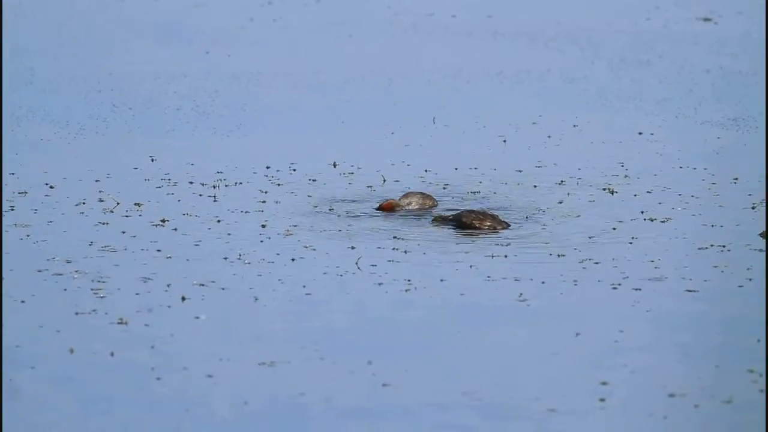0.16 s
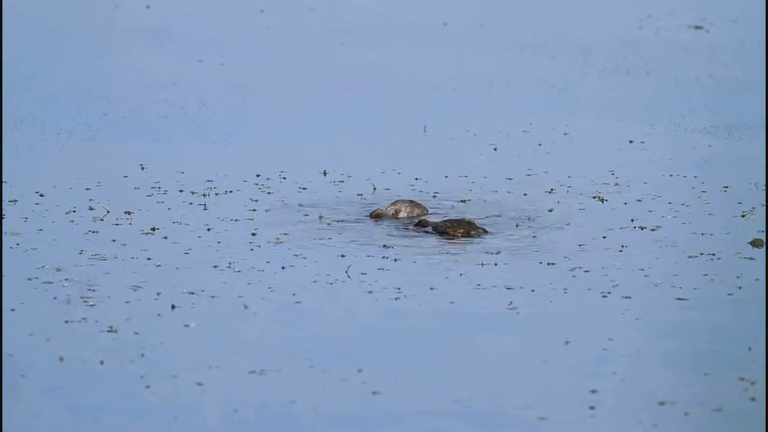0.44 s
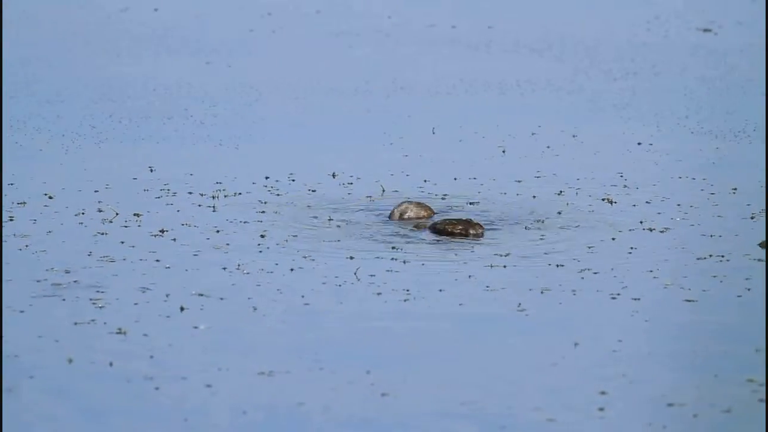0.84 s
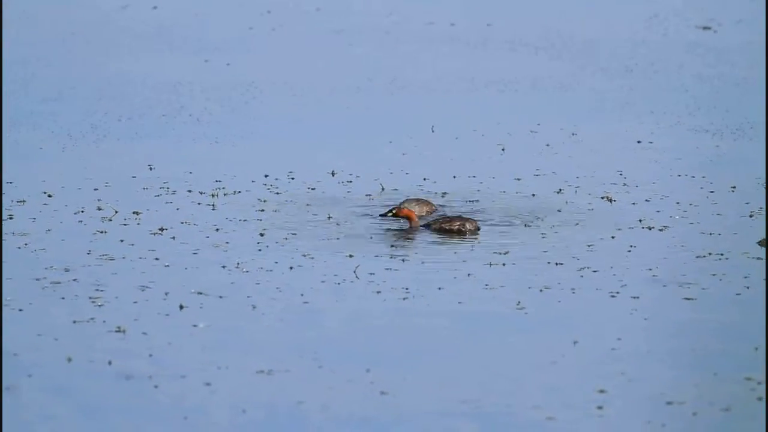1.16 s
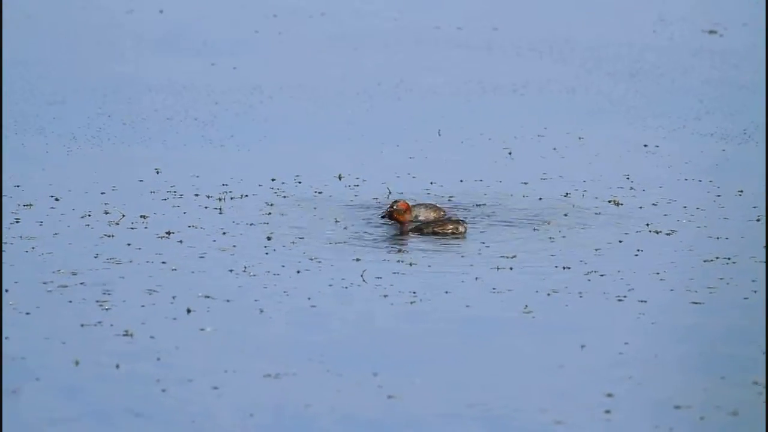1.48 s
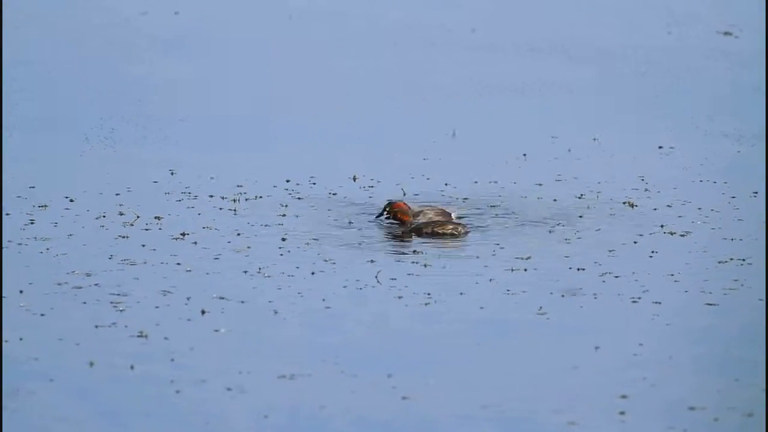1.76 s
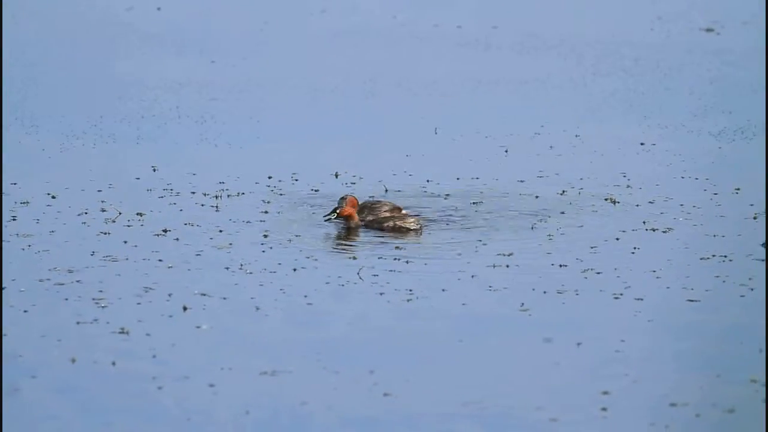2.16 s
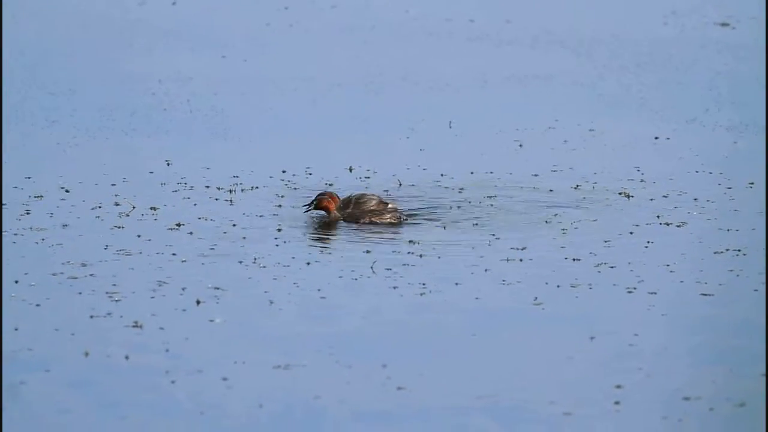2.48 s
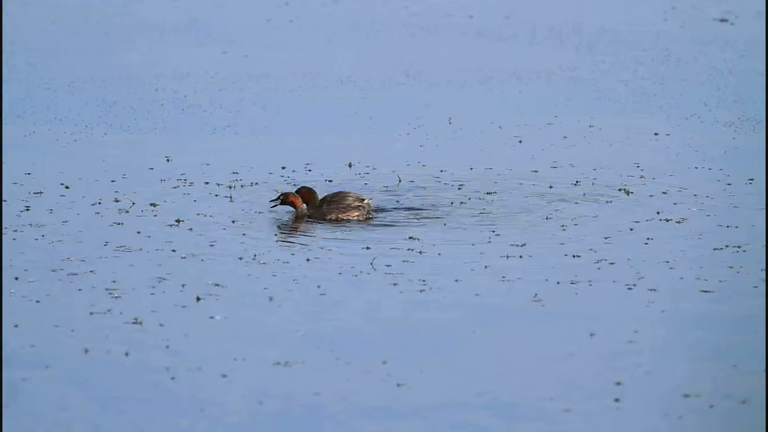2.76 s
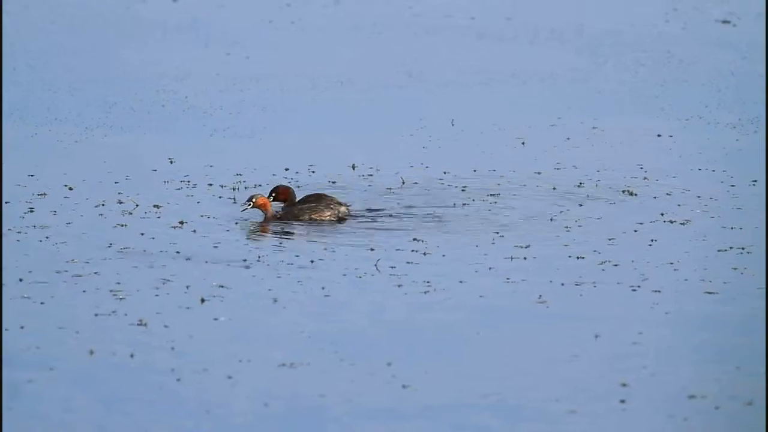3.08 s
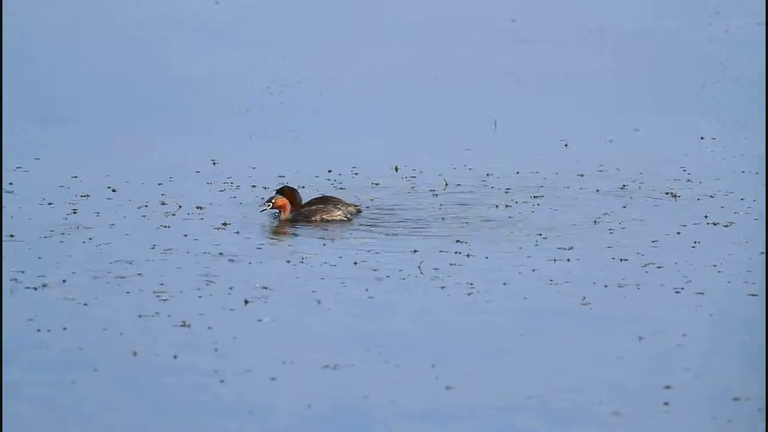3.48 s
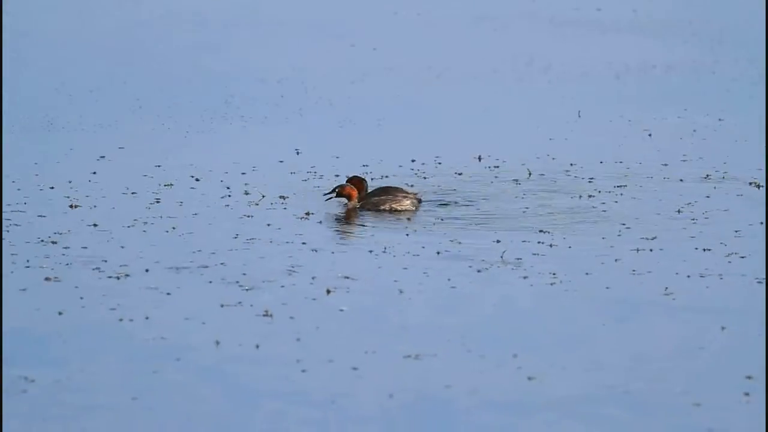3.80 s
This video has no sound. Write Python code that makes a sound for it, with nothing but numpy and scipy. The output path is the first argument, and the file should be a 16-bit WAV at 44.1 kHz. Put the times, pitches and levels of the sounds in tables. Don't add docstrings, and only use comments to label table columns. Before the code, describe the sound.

After about two seconds of hissy outdoor quiet with far birdsong and wind bumps on the microphone, two water birds burst into a fast chattering duet, one voice low and clean, the other higher and hoarse.

```python
import sys
import numpy as np
from scipy import signal
from scipy.fft import rfft, irfft, next_fast_len
from scipy.io import wavfile
from scipy.ndimage import uniform_filter1d, map_coordinates

SR = 44100
rng = np.random.default_rng(int(sys.argv[2]) if len(sys.argv) > 2 else 0)


def volts_from_decibels(level):
    exponent = np.asarray(level, float) / 20
    return 10 ** exponent


def waveform_to_disk(signal):
    frames = np.transpose(np.atleast_2d(signal))
    scaled = np.clip(frames, -1, 1) * 32767
    samples = np.round(scaled).astype(np.int16)
    wavfile.write(sys.argv[1], SR, samples)


N = 173754

# (f/Hz, density/dB per Hz)
AIR_SPECTRUM = [(240, -4.5), (400, -3.5), (552, -8.5), (835, -8), (2800, -19.5), (3270, -18), (3920, -21),
                (4650, -23.5), (15600, -34)]
# (f/Hz, level/dB)
LOW_THROAT = [(1150, -7), (1400, -12), (5150, -6), (5450, -19), (6900, -24), (9500, -34.5), (12500, -26),
              (14000, -24), (15500, -39)]
HOARSE_THROAT = [(1500, -11.5), (5500, -34.5), (6400, -23.5), (8000, -34.5), (10500, -28.5), (13000, -19),
                 (14500, -30), (15500, -42)]
# (t/s, level/dB)
EFFORT = [(1.9, 3), (2.1, -1), (2.27, 5), (2.45, 4.5), (2.6, 0), (3.2, .2), (3.9, -2.5)]
CLEAR_HZ = 1534


def unit(x):
    return x / np.sqrt(np.mean(x ** 2) + 1e-20)


def along(points, hz):
    f, v = np.transpose(points)
    return np.interp(np.log(hz + 1), np.log(f + 1), v)


def wobble(rate, size=N):
    knots = rng.standard_normal(size // 16 + 9)
    return map_coordinates(knots, [np.arange(size) * rate / SR])


def noise(response):
    m = next_fast_len(N)
    spectrum = rfft(rng.standard_normal(m)) * response(np.fft.rfftfreq(m, 1 / SR))
    return unit(irfft(spectrum, m)[:N])


def echoes(x, t60):
    t = np.arange(SR // 2) / SR
    tail = rng.standard_normal(len(t)) * volts_from_decibels(-60 * t / t60) * (t > .004)
    return signal.fftconvolve(x, tail / np.linalg.norm(tail))[:N]


def air():
    return volts_from_decibels(-46) * noise(lambda hz: volts_from_decibels(along(AIR_SPECTRUM, hz)))


def rumble():
    # (f/Hz, density/dB per Hz)
    rumble_spectrum = [(22, -23), (50, 1.5), (150, -1.5), (350, -2.5), (480, -44), (900, -120)]
    level_db = -44.5 + 2.17 * wobble(25.165) + 0.37 * wobble(3.27)
    return volts_from_decibels(level_db) * noise(lambda hz: volts_from_decibels(along(rumble_spectrum, hz)))


def insects():
    centre_hz, width_hz = 3250, 120
    level_db = -59.8 - 1.2 * np.arange(N) / SR + 1.5 * wobble(8)
    return volts_from_decibels(level_db) * noise(lambda hz: np.exp(-((hz - centre_hz) / width_hz) ** 2))


def far_chorus():
    # (f/Hz, width/Hz, level/dB, fading/dB per s)
    blurs = [
        (2300, 350, -60, 1.5),
        (4700, 500, -64, 1.5),
    ]
    t, out = np.arange(N) / SR, np.zeros(N)
    for centre_hz, width_hz, db, fade_db in blurs:
        band = noise(lambda f: np.exp(-((f - centre_hz) / width_hz) ** 2))
        out += volts_from_decibels(db - fade_db * t + 1.5 * wobble(6)) * band
    return out


def rustle():
    # (t/s, half length/s, level/dB)
    rustles = [
        (1.455, .015, -53),
        (1.957, .003, -48),
    ]
    t = np.arange(N) / SR
    envelope = sum(volts_from_decibels(db) * np.exp(-((t - s) / half_s) ** 2) for s, half_s, db in rustles)
    return envelope * noise(lambda hz: volts_from_decibels(along(AIR_SPECTRUM, hz)) * (hz > 1900))


def drone():
    # (f/Hz, level/dB, fading/dB per s)
    engine_orders = [(97.7, -42.5, 1.67), (197, -48.5, 3.5), (226.8, -50.5, 8.5), (259.9, -52, 3),
                     (300.5, -48.5, 7)]
    t, out = np.arange(N) / SR, np.zeros(N)
    for hz, db, fade_db in engine_orders:
        level_db = db - fade_db * t + 1.6 * wobble(9.47)
        out += np.sqrt(2) * volts_from_decibels(level_db) * np.sin(2 * np.pi * hz * t)
    return out


def bumps():
    # (t/s, peak level/dB, f/Hz)
    pushes = [(1.843, -26.5, 131), (1.882, -19.5, 96.4), (2.791, -24.5, 280), (2.799, -26.5, 95),
              (2.982, -29.5, 94), (3.172, -27.5, 127), (3.47, -29.5, 100)]
    t, out = np.arange(N) / SR, np.zeros(N)
    for s, db, hz in pushes:
        envelope = np.exp(-((t - s) * hz / 0.58) ** 2)
        out += volts_from_decibels(db) * envelope * np.cos(2 * np.pi * hz * (t - s))
    return out


def songbirds():
    # (t after start/s, f/Hz, level/dB)
    falling = [(0, 4400, -7), (.022, 5000, -5), (0.048, 4860, 1), (.066, 4400, -6.5), (0.101, 3950, -1),
               (0.136, 3665, -7.5), (0.176, 3900, -1), (.222, 3450, -7)]
    rising = [(0, 4350, -2), (.08, 5300, 3.5), (.12, 6500, -2), (.145, 7200, -8)]
    chip = [(0, 3600, 0), (.018, 3300, 0)]
    # (start/s, level/dB, phrase, share of side partials)
    songs = [(.01, -49, falling, 1), (.53, -61, rising, 0), (1.012, -49, falling, 0.9),
             (1.725, -55, chip, 0), (3.78, -67, rising, 0)]
    t, out = np.arange(N) / SR, np.zeros(N)
    for start, song_db, phrase, rich in songs:
        s, hz, db = np.transpose(phrase)
        glide = uniform_filter1d(np.interp(t - start, s, hz), size=400)
        half_turn = np.pi * np.cumsum(glide * (1 + .015 * wobble(150))) / SR
        side_partials = volts_from_decibels(-7.5) * np.sin(half_turn) + volts_from_decibels(-16) * np.sin(3 * half_turn)
        tone = np.sin(2 * half_turn) + rich * side_partials
        contour_db = song_db + np.interp(t - start, s, db, -120, -120)
        envelope = uniform_filter1d(volts_from_decibels(contour_db), size=300) * volts_from_decibels(3.5 * wobble(130))
        out += envelope * tone * np.sqrt(2)
    return out + volts_from_decibels(-3) * echoes(out, .3)


def rasp():
    t = np.arange(N) / SR
    level_db = -57.5 + 2 * np.interp(t, *np.transpose(EFFORT))
    hiss = noise(lambda hz: volts_from_decibels(along(LOW_THROAT, hz) / 2) * (hz > CLEAR_HZ))
    return volts_from_decibels(level_db) * (t > 2.04) * hiss


def sing(rows, shape, throat, order, hoarser=0, pointed=0, beat=0, tail=1, sag_db=0):
    flutter_hz, jitter = 449, 0.06
    strong_db = -30
    half_s, edge, rise, fall, power, rough, scatter_db = shape
    out, t = np.zeros(N + SR), np.arange(-1024, 1024) / SR
    size, k = len(t), np.arange(1, 15)[:, None]
    for s, top_hz, db, lower_db, *length in rows:
        weak_db = strong_db - db
        highest = k * top_hz > 6000
        u = np.clip(t / half_s / np.prod(length) / np.where(t > 0, tail, 1), -1, 1)
        cap = np.sin(np.pi / 2 * np.clip((edge - abs(u)) / 0.4, 0, 1))
        slide = volts_from_decibels(min(-8 + weak_db / 2, -2)) * np.clip(6 * (1 - abs(u)), 0, 1)
        swell = np.maximum(cap, slide)

        unsteady = rough * (1 + hoarser * max(1 - top_hz / CLEAR_HZ, 0)) + .5 * (1 - cap) ** 2
        arch = abs(u) ** max(power - pointed * max(weak_db, 0), 1.5)
        hz = top_hz * (1 - np.where(u < 0, rise, fall) * arch)
        hz = hz * (1 + jitter * np.tanh(unsteady) * wobble(flutter_hz, size))

        level = db + lower_db / 2 + along(throat, k * hz) + scatter_db * rng.standard_normal(k.shape)
        level += np.interp(s, *np.transpose(EFFORT)) * highest
        level[order - 1] = db + min(lower_db, 0) * (1 - cap)
        level[order - 2] = db + lower_db
        level[order] += min(lower_db, 0) / 2
        level -= sag_db * u + 18 * (k > 1) * np.clip((2050 - k * hz) / 250, 0, 1)

        shake = 1 + unsteady * np.array([wobble(flutter_hz, size) for _ in k])
        breath = volts_from_decibels(-12) + 3 * unsteady ** 2 / (1 + unsteady) * highest
        shake += breath * np.array([wobble(top_hz, size) for _ in k])

        turn = 2 * np.pi * (k * np.cumsum(hz) / SR + rng.random(k.shape))
        beat_turn = 2 * np.pi * np.cumsum(430 * (1 + .15 * wobble(120, size))) / SR
        depth = np.tanh(beat * unsteady) * (k >= order)
        tone = (np.sin(turn) + depth * np.sin(turn - beat_turn)) / np.sqrt(1 + depth ** 2)
        partials = volts_from_decibels(level) * shake * (k * hz < 15780) * tone
        note = swell * partials.sum(0) / np.sqrt(1 + unsteady ** 2)
        out[round(s * SR) - size // 2:][:size] += note
    return out[:N]


def first_tries():
    # (centre/s, top f/Hz, third partial/dB, second over third/dB, length over the usual)
    tries = [
        (1.834, 1070, -53, -9),
        (1.942, 1150, -49, -9),
        (2.016, 1430, -45, 4, 1.7),
        (2.077, 1100, -54, 17, .55),
    ]
    # (half length/s, cap share, pitch drop at start, at end, arch power, roughness, scatter/dB)
    try_shape = (.012, .95, .3, .02, 1.1, .2, 3)
    return sing(tries, try_shape, HOARSE_THROAT, order=3, tail=.35)


def whistled_notes():
    # (centre/s, f/Hz, second partial/dB, first over second/dB, length over the usual)
    whistles = [(1.817, 2110, -58, 14, .75), (1.870, 2010, -51, 9.5, 1.4), (1.898, 2237, -45, 9, .55),
                (1.911, 2504, -49, 9.5, .5), (1.932, 2100, -58, 17, .65), (2.022, 2360, -42, 5, .7),
                (2.085, 2476, -32.5, -4.5), (2.147, 2479, -30.5, -4), (2.208, 2464, -31, -1),
                (2.686, 2460, -32, -5), (2.741, 2452, -32.5, -2), (2.793, 2490, -32.5, -1.5),
                (2.859, 2472, -33.5, -1), (3.209, 2350, -38, 3, .45), (3.263, 2350, -32.5, 1.5),
                (3.319, 2332, -31, 0.5), (3.383, 2314, -31.5, 1.5)]
    # (f/Hz, level/dB)
    whistle_throat = [(6000, -28.5), (7400, -15), (9800, -23), (12200, -20.5), (14700, -21)]
    # (half length/s, cap share, pitch drop at start, at end, arch power, roughness, scatter/dB)
    opening_shape = (0.0151, 0.95, 0.07, .03, 1.5, 0.1, 3)
    whistle_shape = (.0105, .9, .02, .03, 3, .06, 3.5)
    croak_shape = (.009, .9, .22, .05, 1.5, 1.4, 3)
    croaks = [(s - .012, hz * .58, db, -4) for s, hz, db, *_ in whistles[7:]]
    openings = sing(whistles[:5], opening_shape, whistle_throat, order=2)
    trill = sing(whistles[5:], whistle_shape, whistle_throat, order=2)
    return openings + trill + sing(croaks, croak_shape, HOARSE_THROAT, order=3)


def hoarse_notes():
    # (centre/s, top f/Hz, third partial/dB, second over third/dB, length over the usual)
    hoarse = [(2.264, 1435, -26, -6.5), (2.327, 1556, -27, -4), (2.385, 1612, -28.5, -4),
              (2.444, 1633, -29, -2.5), (2.502, 1570, -30.5, -5.5), (2.561, 1481, -24.5, -9.5),
              (2.621, 1550, -32, -1), (2.913, 1550.0, -29, -6.5), (2.969, 1558, -28, -6.5),
              (3.028, 1570, -31.5, -1), (3.086, 1575, -29, -1.5), (3.145, 1498, -28.5, -3),
              (3.200, 1520, -33, -3, 1.1), (3.438, 1476, -31.5, -3), (3.499, 1484, -28.5, -1),
              (3.558, 1530, -30, -1), (3.616, 1487, -28.5, -2, .75), (3.678, 1472, -26.5, -7),
              (3.736, 1535.0, -30.5, -1.5), (3.799, 1497, -28, -3.5), (3.855, 1490, -31, -1.5),
              (3.915, 1542, -29.5, -2)]
    # (half length/s, cap share, pitch drop at start, at end, arch power, roughness, scatter/dB)
    hoarse_shape = (.0155, .95, .3, .12, 3.4, .18, 2.2)
    return sing(hoarse, hoarse_shape, HOARSE_THROAT, order=3, hoarser=5.1, beat=2.5, tail=.8, sag_db=1.2)


def low_bird():
    # (centre/s, top f/Hz, third partial/dB, second over third/dB, length over the usual)
    early_trill = [(2.052, 1460, -28.5, 1.5), (2.115, 1470, -29, 1, .8), (2.181, 1379, -26.5, -6),
                   (2.243, 1440, -27, -2.5), (2.304, 1400, -25.5, -5), (2.361, 1395, -28, -3),
                   (2.422, 1377, -28, -3.5), (2.477, 1418, -27.5, -4.5), (2.538, 1397, -25, -7),
                   (2.593, 1375, -22.5, -11.5), (2.651, 1372, -27, -9), (2.709, 1373, -28.5, -4),
                   (2.769, 1324, -33, -2.5), (2.828, 1325.0, -33.5, -2.5), (2.884, 1339, -31.5, -2.5),
                   (2.943, 1360, -30, -6), (3.001, 1336, -30, -8)]
    late_trill = [(3.061, 1296, -37.5, -1), (3.119, 1224, -37, -2.5), (3.178, 1260, -35.5, -2.5),
                  (3.236, 1288, -29, -13), (3.294, 1294, -26.0, -21), (3.351, 1315, -30, -13.5),
                  (3.415, 1148, -34, -1, 1.15), (3.472, 1165, -33, -1.5, 1.15),
                  (3.53, 1140, -35.5, 1, 1.15), (3.589, 1220.0, -41.5, 0.5), (3.649, 1362, -28.0, -7.5),
                  (3.711, 1290, -30.0, -9.5), (3.768, 1273, -31.5, -10.0), (3.827, 1182, -40, 0.5),
                  (3.889, 1133, -40.5, 1.5)]
    # (half length/s, cap share, pitch drop at start, at end, arch power, roughness, scatter/dB)
    low_shape = (.017, .66, .36, .36, 3.1, .07, 2.2)
    return sing(early_trill + late_trill, low_shape, LOW_THROAT, order=3, pointed=.17)


def duet():
    birds = low_bird() + hoarse_notes() + whistled_notes() + first_tries()
    slap = volts_from_decibels(-15) * np.roll(birds, round(.015 * SR)) * (np.arange(N) > SR)
    shore = volts_from_decibels(-11) * echoes(birds, .16)
    return birds + slap + shore


def scene():
    background = air() + rumble() + insects() + far_chorus() + rustle() + drone() + bumps()
    return (background + songbirds() + rasp() + duet())[None]


def roll_off(x):
    return signal.sosfilt(signal.butter(12, 15740, fs=SR, output="sos"), x)


def record(dry):
    return roll_off(dry)


dry = scene()
out = record(dry)
waveform_to_disk(out)
```